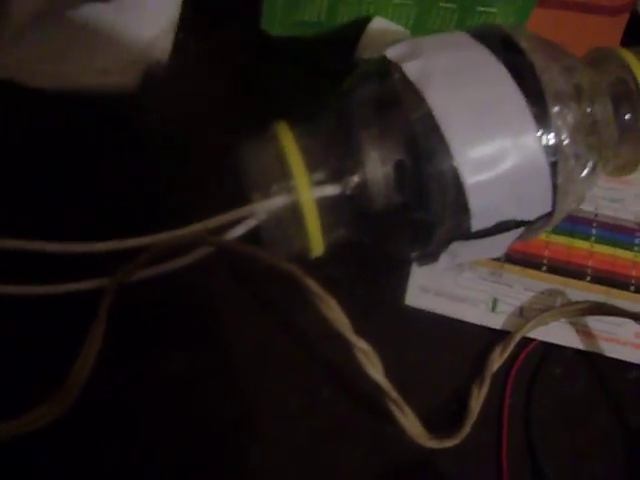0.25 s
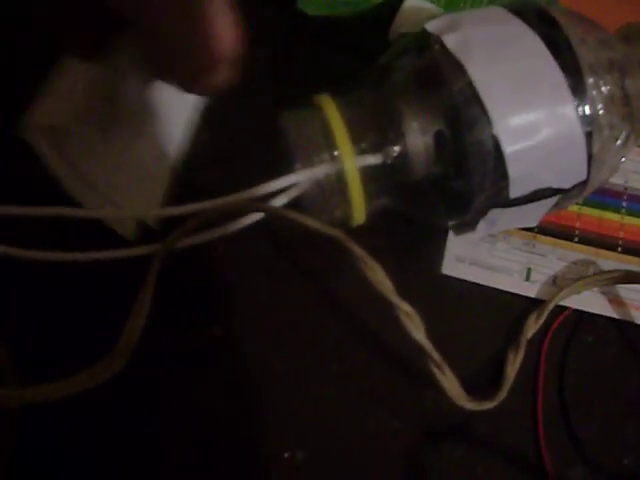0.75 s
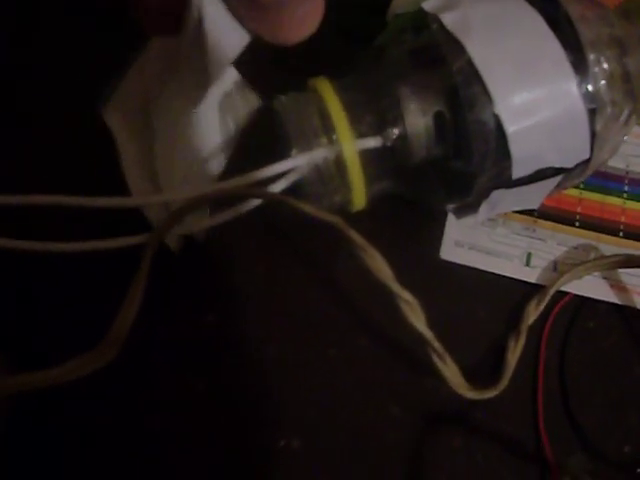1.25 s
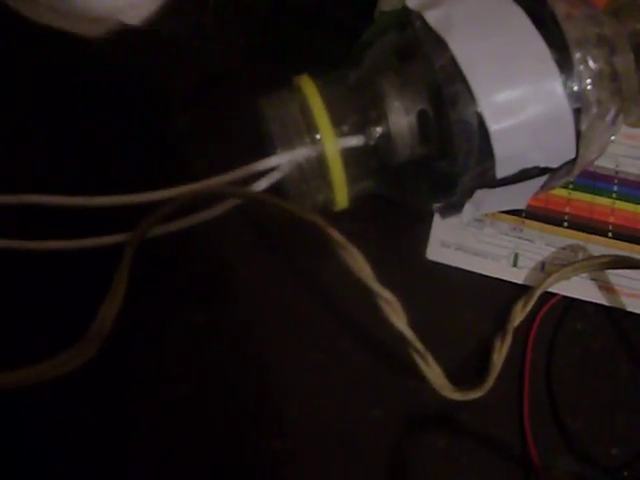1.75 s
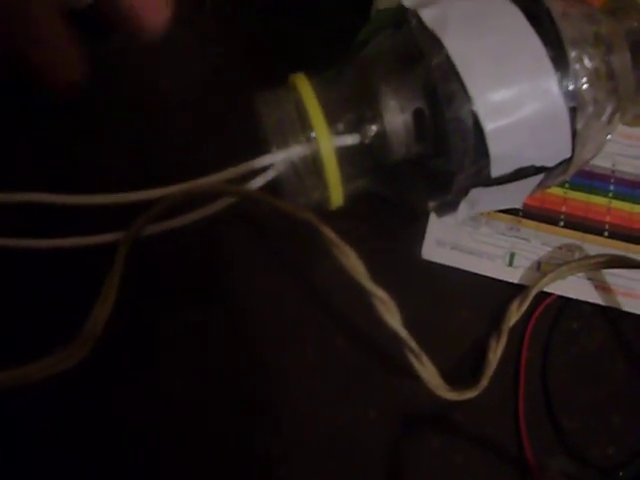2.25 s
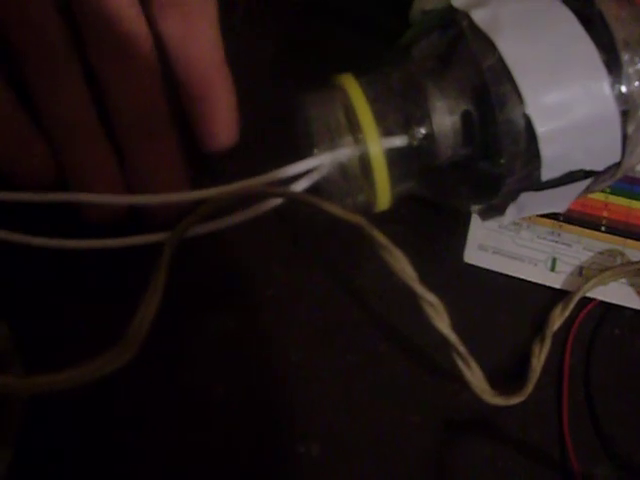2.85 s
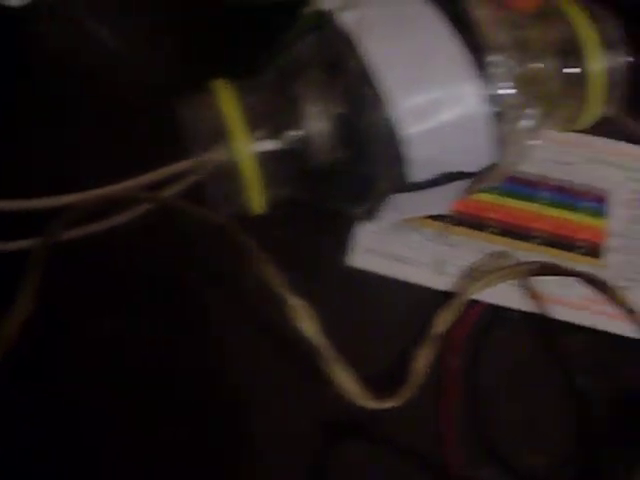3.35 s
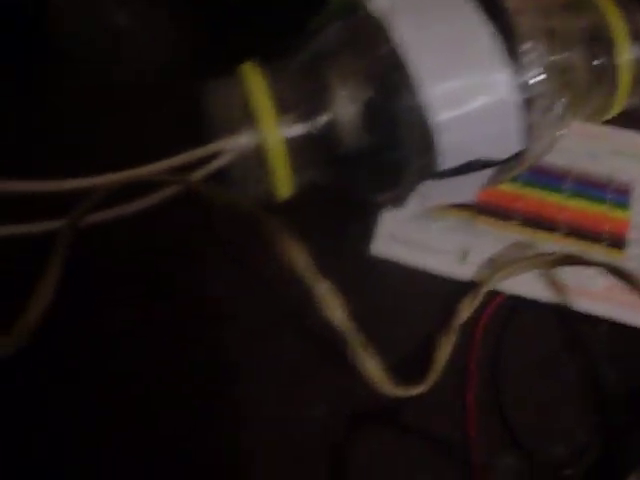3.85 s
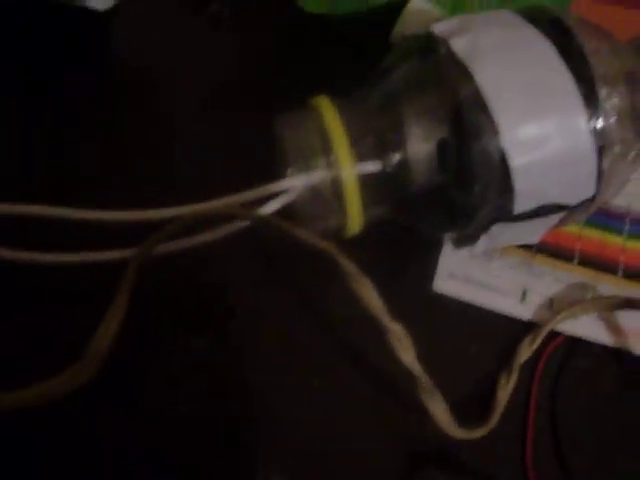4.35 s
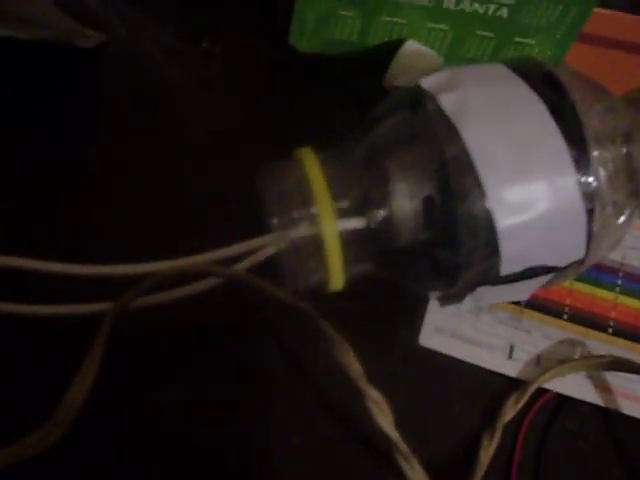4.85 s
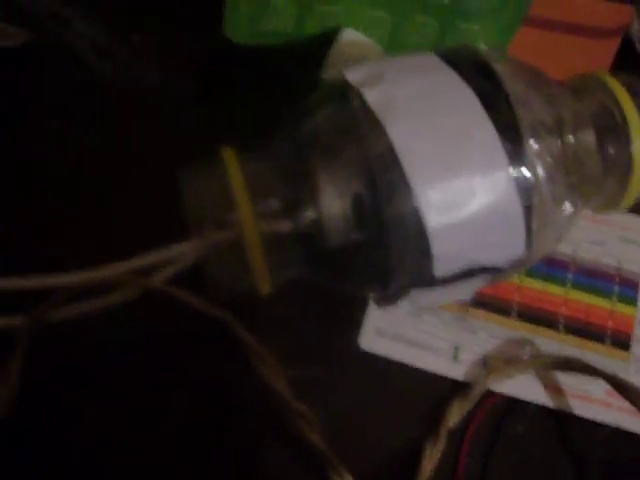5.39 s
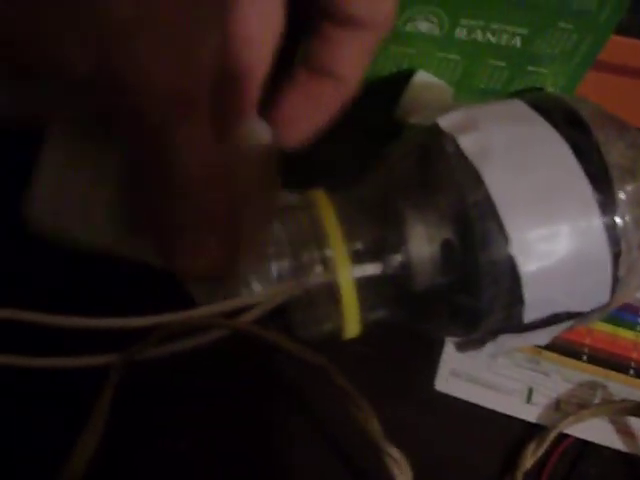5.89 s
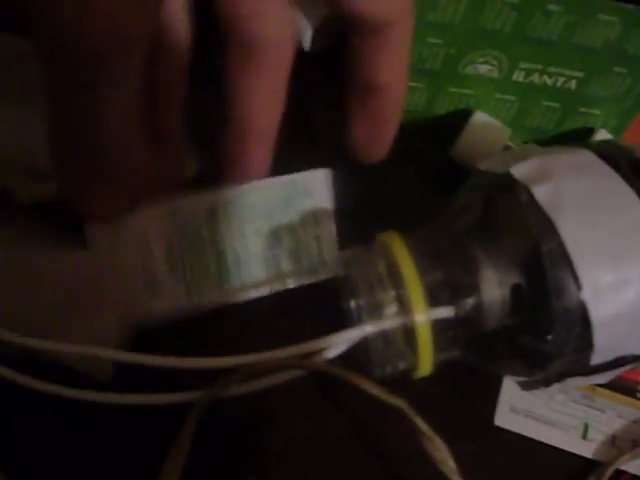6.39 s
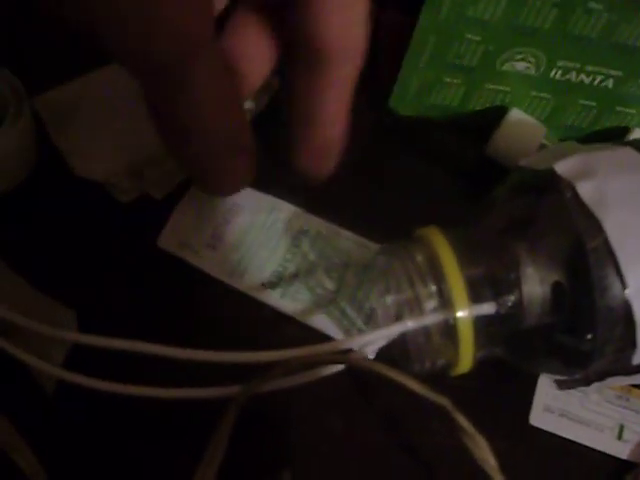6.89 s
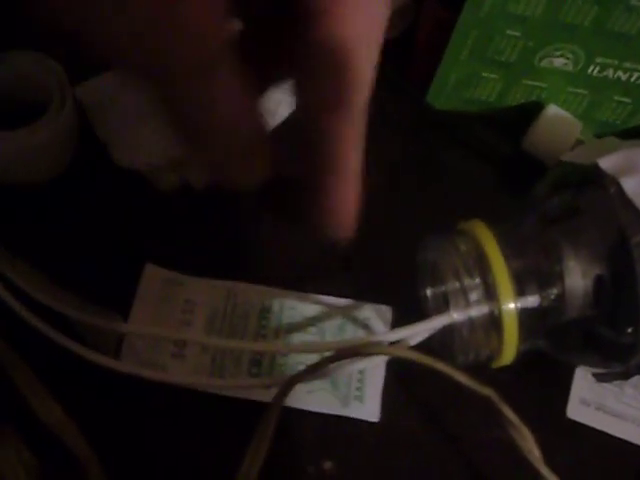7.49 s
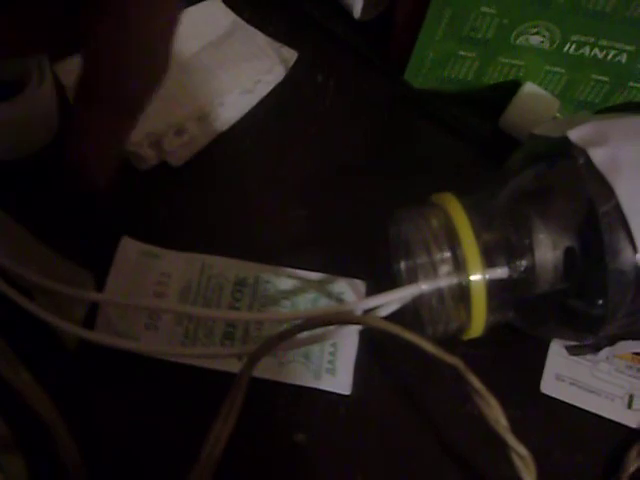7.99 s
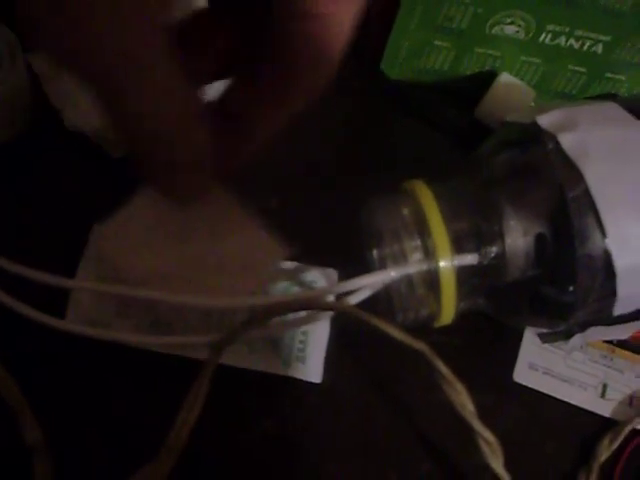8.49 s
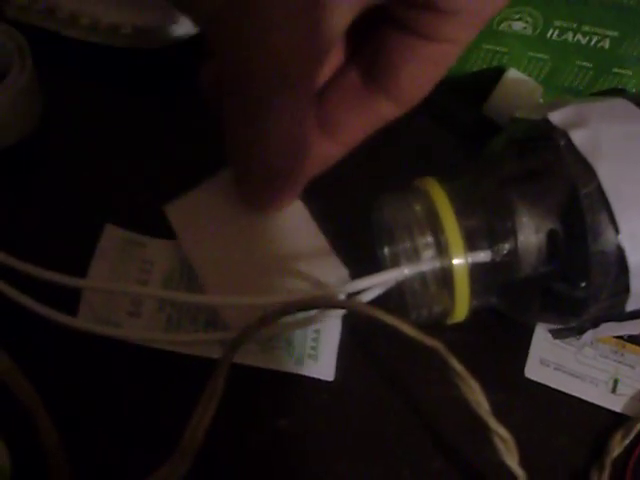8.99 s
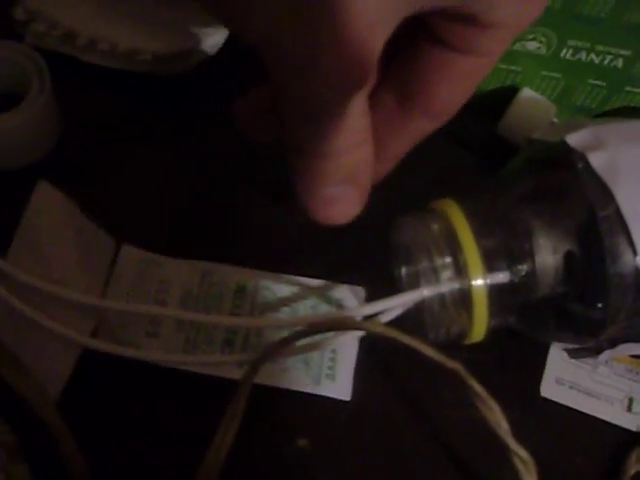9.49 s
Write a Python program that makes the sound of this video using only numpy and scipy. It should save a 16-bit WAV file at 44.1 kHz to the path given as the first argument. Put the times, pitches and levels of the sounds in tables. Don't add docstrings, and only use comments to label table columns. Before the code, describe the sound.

A tiny electric fan drones without pause, its nasal hum near one kilohertz mixed with breathy, bottle-coloured air noise and a faint, very high camera whine. The close handheld microphone shifts a little, changing the tone. Light paper rustles, two quick desk knocks, snapping plastic and crackling folds arrive in sequence; the fan rises very slightly as paper covers the mouth, then settles, with a late knock and crease.

```python
import sys
import numpy as np
from scipy import signal
from scipy.io import wavfile
from scipy.ndimage import uniform_filter1d

SR = 44100
rng = np.random.default_rng(int(sys.argv[2]) if len(sys.argv) > 2 else 0)


def linear_from_db(decibels):
    return 10 ** (np.asarray(decibels, float) / 20)


def wrap_up_sound(samples):
    columns = np.atleast_2d(samples).T
    tamed = np.clip(columns, -1, 1)
    steps = np.round(tamed * 32767).astype(np.int16)
    wavfile.write(sys.argv[1], SR, steps)


N = 429534

# time_s, ninth_multiple_hz
FAN_SPEED = [(0, 960.5), (.38, 963), (1.9, 957.7), (2.27, 964.2), (3.1, 961.7), (3.8, 962.4), (5.5, 959.3),
             (7.2, 956.5), (7.7, 958.2), (8.3, 958.2), (8.6, 956.6), (9.15, 957), (9.4, 959), (9.74, 958.3)]
# time_s, place (0 first, 1 second, 2 third; may lie between or slightly beyond)
LISTENING_PLACE = [
    (0, 0.17),
    (4.3, 0),
    (5.0, 0.85),
    (6.3, 0.98),
    (6.7, 2.2),
    (9.74, 1.7),
]
FAN_LEVEL_DB = [-0.73, 0.53, -0.2]
# multiple of shaft speed (rounded to a whole number),
# then level_db at each of the three places
FAN_TONES = [(2, -88, -82, -83.5), (4, -78, -94, -79.5), (5, -59.5, -61, -61), (6, -71, -67, -68.5),
             (7, -61, -64.5, -60.5), (8, -64, -67.5, -63), (8.95, -53, -52, -51.5), (10, -59, -57.5, -59),
             (11, -64.5, -64.5, -63.5), (13, -67.5, -65, -64.5), (14, -59.5, -62, -62),
             (15, -74, -62.5, -63), (16, -62.5, -62, -67), (17, -57, -56, -57.5), (18, -64, -58.5, -61),
             (19, -80.5, -62, -75), (21, -73, -73, -73), (22, -80, -90, -87), (31.48, -69, -69.5, -74),
             (35, -76.5, -85, -71),
             (12, -74, -80, -77), (20, -77, -76, -88), (24, -78, -81, -87), (27, -82, -86, -77),
               (33, -82, -81, -77), (36, -83, -88, -80), (40, -80, -80, -86), (41, -81, -78, -76),
               (44, -81, -80, -76), (45, -80, -82, -79), (48, -80, -85, -87), (49, -82, -76, -89),
               (50, -81, -77, -87), (51, -84, -95, -76), (54, -83, -80, -79)]
MOUTH_TONES = (13, 14, 16, 16, 17, 21, 27, 27, 31, 31, 33, 33, 41)
# pitch_hz, level_db (per Hz)
AIR_NOISE = [(20, -102), (60, -105), (150, -104), (370, -101), (500, -88), (1200, -88), (1600, -84),
             (2300, -93), (2700, -95.5), (6500, -102), (9000, -100), (10500, -104), (11500, -112),
             (12300, -122)]
# pitch_hz, width_hz, first_level_db, last_level_db (both per Hz)
BOTTLE_RINGS = [(212.7, 33, -90.5, -89.5), (283, 12, -96, -101), (302, 71, -91, -89),
                (403.6, 15.3, -79.5, -79), (468, 36, -87, -89), (684, 43, -81, -97),
                (702, 26.4, -76.5, -77.5), (788, 180, -78, -78), (894, 40, -84.5, -82),
                (987.7, 14, -77.5, -76.5), (1435, 14, -96, -102), (1610, 28, -88.5, -79),
                (1805, 75, -79.5, -77), (1915, 102, -76.5, -75), (2013, 57, -81, -76),
                (3000, 220, -92, -105), (3244, 320, -92.5, -91.5), (3750, 760, -99, -96.5),
                (4605, 270, -95, -91), (5000, 1400, -95, -100), (5330, 710, -99, -94),
                (7300, 1800, -104, -104)]
# middle_s, length_s, body_level_db, edge_level_db, crackle_db
PAPER_BENDS = [(.9, .15, -65, -78, 8), (2.053, 0.055, -62, -71, 4), (4.92, 0.071, -61, -66, 4),
               (5.006, 0.093, -58.5, -64.5, 3.5), (5.3, 0.042, -72, -65, 3), (5.845, .05, -61, -71, 3),
               (6.07, 0.035, -64, -57, 3), (6.095, 0.042, -57.5, -64, 1), (6.212, .065, -60, -66, 2),
               (6.42, .06, -60, -71, 6), (6.485, .05, -66, -66, 3), (9.35, .15, -70, -71, 5)]
# pitch_hz, width_hz
PAPER_BANDS = [
    (5100, 1900),
    (9300, 1200),
]
# middle_s, pitch_hz, level_db
SOFT_BUMPS = [
    (3.205, 2070, -60),
    (4.847, 600, -56),
    (5.598, 200, -67),
    (7.92, 2300, -63),
]
# pitch_hz, width_hz, level_db (against the peak)
KNOCK_RINGS = [(2200, 510, -6), (3170, 310, -12), (3900, 1500, -9), (4900, 900, -13), (6000, 1200, -14),
               (9000, 2000, -28)]
# pitch_hz, width_hz, level_db (against the peak)
FLICK_RINGS = [(2950, 500, -14), (3920, 460, -14), (4720, 600, -14), (5300, 690, -11), (7000, 1300, -17),
               (9700, 2600, -16)]
# pitch_hz, width_hz, level_db (against the peak)
SNAP_RINGS = [(2300, 600, -16), (3100, 600, -11.5), (4400, 1100, -19), (6200, 1700, -12),
              (8800, 1800, -12.5), (10400, 1400, -18)]
# pitch_hz, width_hz, level_db (against the peak)
CREASE_RINGS = [(3000, 1500, -19), (4870, 700, -9.5), (5430, 750, -12), (6800, 1800, -19),
                (9200, 1700, -18.5)]
# start_s, peak_db, pitch_scale (1 = usual), brightness_db (per octave)
KNOCK_TIMES = [
    (2.1076, -48, 1.2, 0),
    (3.1955, -35.5, 1.1, 3),
    (3.2297, -40.5, 0.92, -2),
    (7.905, -43, 1., 0),
]
# start_s, peak_db, pitch_scale (1 = usual), brightness_db (per octave)
FLICK_TIMES = [
    (4.9764, -47, 1., 2),
    (5.0715, -33, 1., 0),
    (5.0755, -36, 1., 0.22),
]
# start_s, peak_db, pitch_scale (1 = usual), brightness_db (per octave)
SNAP_TIMES = [
    (4.863, -48, 1., 1),
    (5.348, -33, 1., 1.5),
    (5.36, -46, 0.91, 0),
]
# start_s, peak_db, pitch_scale (1 = usual), brightness_db (per octave)
CREASE_TIMES = [(5.842, -46, 1.1, -3), (5.9958, -45, .97, 0), (6.0054, -42, .97, -1),
                (6.0267, -40, 0.93, 0), (6.099, -40, .97, 3), (6.1444, -42, 1., 4), (6.2174, -44, 1.05, 7),
                (6.2394, -44, 0.87, 4), (6.4056, -44, 1.05, 0), (6.464, -40, .99, 13), (6.4746, -33, 1, -1),
                (6.478, -41, 0.88, -2), (6.5004, -45, 1.15, 1), (7.207, -39, 1.08, -1),
                (9.429, -35, 0.99, -1), (9.441, -41, 1., -6)]


def evened(x):
    return x / np.sqrt(np.mean(x ** 2) + 1e-30)


def curve(rows, column=1):
    rows = np.array(rows)
    return np.interp(np.arange(N) / SR, rows[:, 0], rows[:, column])


def wander(hz):
    coarse = rng.standard_normal(N // 100 + 2)
    smooth = signal.lfilter(*signal.butter(2, hz * 200 / SR), coarse)
    return np.interp(np.arange(N) / 100, np.arange(len(coarse)), evened(smooth))


def band(x, hz, width):
    edges = [hz - width / 2, hz + width / 2]
    return signal.sosfilt(signal.butter(2, edges, "band", fs=SR, output="sos"), x)


def cover():
    middle_s, half_s = 6.12, 0.29
    return np.exp(-((np.arange(N) / SR - middle_s) / half_s) ** 2)


def shaft_angle():
    speedup_hz, tremble_hz = 12.0, 0.05
    tremble = tremble_hz * wander(hz=20.0)
    turns_per_s = (curve(FAN_SPEED) + speedup_hz * cover()) / 9 + tremble
    return 2 * np.pi * np.cumsum(turns_per_s) / SR


def fan_level():
    return linear_from_db(np.interp(curve(LISTENING_PLACE), range(3), FAN_LEVEL_DB))


def motor(angle):
    out = np.zeros(N)
    place = curve(LISTENING_PLACE)
    paper_db = -5.5 * cover()
    for multiple, *place_db in FAN_TONES:
        k = round(multiple)
        sway_db = (0.5 + 0.018 * multiple) * wander(hz=2.85)
        db = np.interp(place, range(3), place_db) + sway_db + MOUTH_TONES.count(k) * paper_db
        lag = -0.88 * k ** 2 + 0.18 * wander(hz=3.9)
        strength = linear_from_db(db[::8]).repeat(8)[:N]
        out += np.sqrt(2) * strength * np.cos(k * angle + lag)
    return out


def air(angle):
    frames = N // 1024 + 5
    hz = np.fft.rfftfreq(4096, 1 / SR)
    late = np.interp(np.arange(frames) * 1024 / SR, *np.transpose(LISTENING_PLACE)) / 2
    smooth_hz, smooth_db = np.transpose(AIR_NOISE)
    smooth = linear_from_db(np.interp(np.log(hz + 1), np.log(smooth_hz), smooth_db))
    power = smooth[:, None] ** 2 * np.ones(frames)
    for ring_hz, width, first_db, last_db in BOTTLE_RINGS:
        shape = 1 / (1 + (2 * (hz - ring_hz) / width) ** 4)
        power += shape[:, None] * linear_from_db(first_db + (last_db - first_db) * late) ** 2
    real, imaginary, patches = rng.standard_normal((frames, len(hz), 3)).T
    patches = uniform_filter1d(patches, size=40, axis=0)
    patches = evened(uniform_filter1d(patches, size=5, axis=1))
    spectrum = (real + 1j * imaginary) * np.sqrt(power) * linear_from_db(0.59 * patches + 9.5)
    rush = signal.istft(spectrum, nperseg=4096, noverlap=3072)[1][:N]
    treble = band(rush, hz=6900, width=7900)
    body = band(rush, hz=1390, width=1680)
    body_pulse = 0.27 * np.cos(angle + 1.55)
    treble_pulse = 0.18 * np.cos(angle) + 0.098 * wander(hz=152.0)
    return rush + body * body_pulse + treble * treble_pulse


def whine():
    whine_hz, frame_hz, flip_rad = 7867.13, 29.97, 1.75
    t = np.arange(N) / SR
    frame = t * frame_hz + 0.225
    flip = uniform_filter1d(0.5 - np.floor(frame) % 2, size=30)
    since_blip_s = ((2 * frame + 0.6) % 1 - 0.5) / (2 * frame_hz)
    carrier = 2 * np.pi * whine_hz * t
    blip_swell = np.exp(-(since_blip_s / 0.0028) ** 2)
    blip = -1.1 * flip * blip_swell * np.sin(carrier - 2 * np.pi * 120 * since_blip_s)
    gap = 1 - 0.89 * np.exp(-((t - 8.375) / 0.0099) ** 2)
    return np.sqrt(2) * linear_from_db(-67.0) * gap * (np.cos(carrier + flip_rad * flip) + blip)


def rustles():
    out, t = np.zeros(N), np.arange(N) / SR
    noise, clumps = rng.standard_normal(N), wander(hz=200.0)
    bursts = []
    for middle_s, length_s, *part_db, crackle_db in PAPER_BENDS:
        for (hz, width), db in zip(PAPER_BANDS, part_db):
            bursts.append((middle_s, length_s, hz, width, db, crackle_db))
    for middle_s, hz, db in SOFT_BUMPS:
        bursts.append((middle_s, 0.05, hz, 50.0, db, 0))
    for middle_s, length_s, hz, width, db, crackle_db in bursts:
        part = slice(round((middle_s - length_s) * SR), round((middle_s + length_s) * SR))
        swell = np.exp(-(2 * (t[part] - middle_s) / length_s) ** 2)
        crackle = band(noise[part] * linear_from_db(crackle_db * clumps[part]), hz, width)
        out[part] += linear_from_db(db) * evened(swell * crackle) * np.sqrt(np.mean(swell ** 2))
    return out


def ticks():
    rise_s, fade_s, after_s, after_share = 0.0018, 0.0013, 0.012, 0.06
    strike = 6.0
    out, t = np.zeros(N), np.arange(1500) / SR
    fade = np.exp(-t / fade_s) + after_share * np.exp(-t / after_s)
    fade = fade * (1 - np.exp(-(t / rise_s) ** 2))
    contact = strike * (np.arange(len(t)) == np.argmax(fade))
    kinds = ((KNOCK_TIMES, KNOCK_RINGS), (FLICK_TIMES, FLICK_RINGS),
             (SNAP_TIMES, SNAP_RINGS), (CREASE_TIMES, CREASE_RINGS))
    for times, rings in kinds:
        for start_s, peak_db, pitch_scale, brightness_db in times:
            noise = rng.standard_normal((len(rings), len(t))) + contact
            tick = np.zeros(len(t))
            for burst, (hz, width, db) in zip(noise, rings):
                ring = evened(band(fade * burst, hz * pitch_scale, width))
                tick += linear_from_db(db + brightness_db * np.log2(hz / 5000)) * ring
            start = round(start_s * SR)
            out[start:start + len(t)] += linear_from_db(peak_db - 13.5) * tick
    return out


def scene():
    angle = shaft_angle()
    fan = (motor(angle) + air(angle)) * fan_level()
    return (fan + ticks() + rustles())[None]


def top_cut(x):
    return signal.sosfilt(signal.butter(12, 12260, fs=SR, output="sos"), x)


def record(dry):
    dull = signal.sosfilt(signal.butter(8, 11300, fs=SR, output="sos"), dry)
    return top_cut(dull + whine())


dry = scene()
out = record(dry)
wrap_up_sound(out)
```